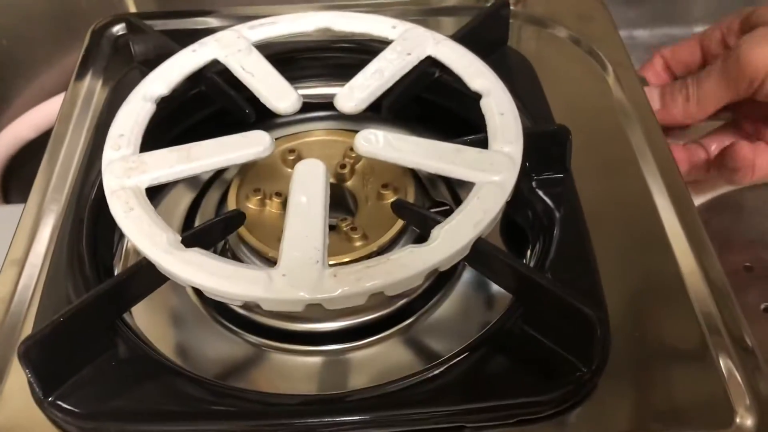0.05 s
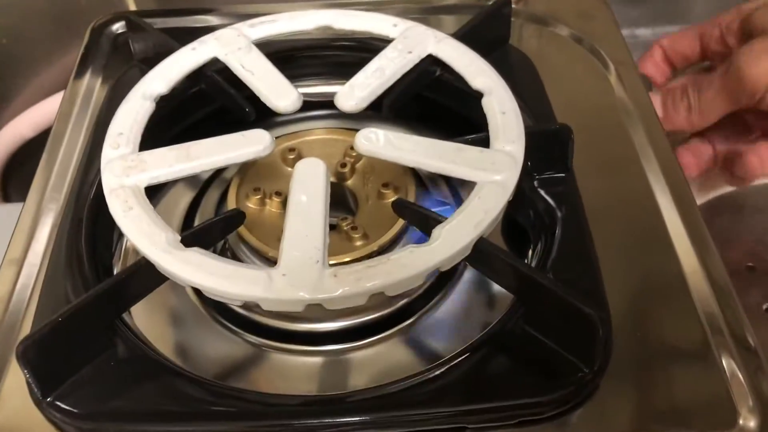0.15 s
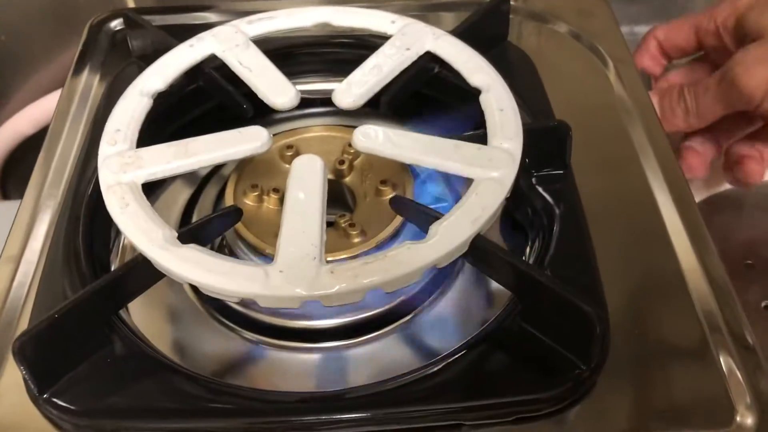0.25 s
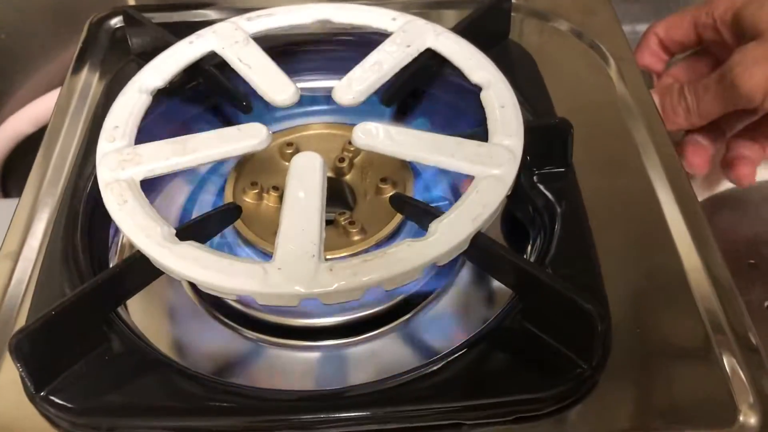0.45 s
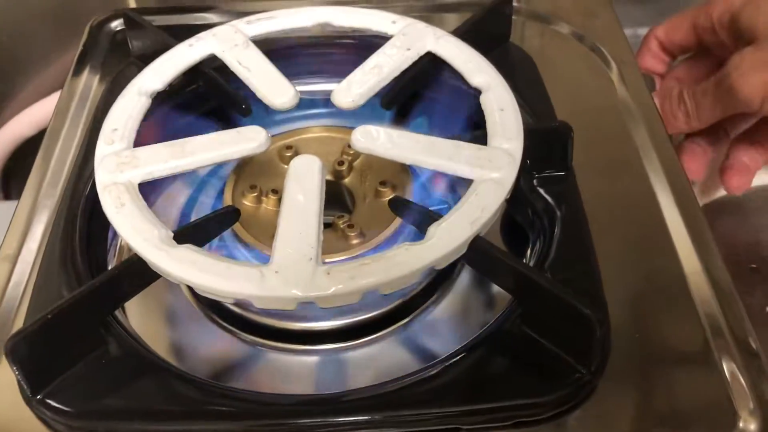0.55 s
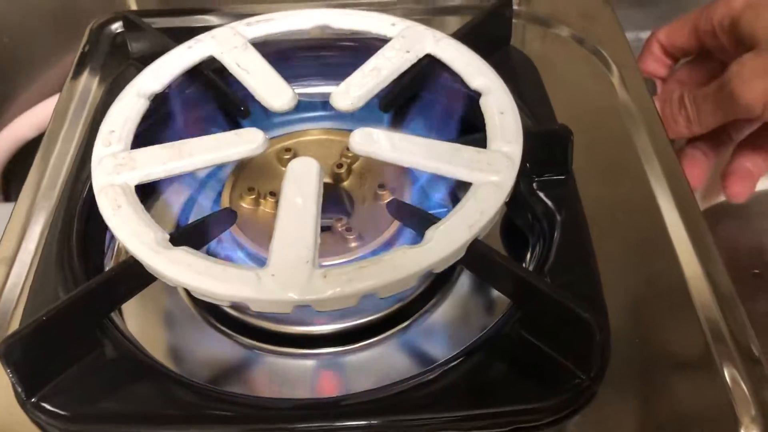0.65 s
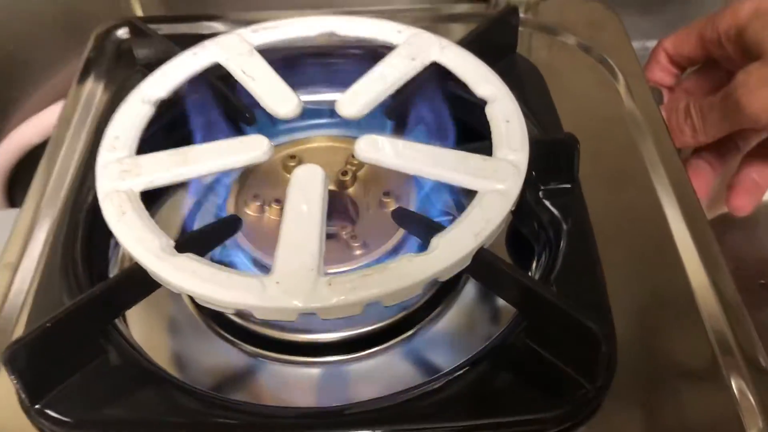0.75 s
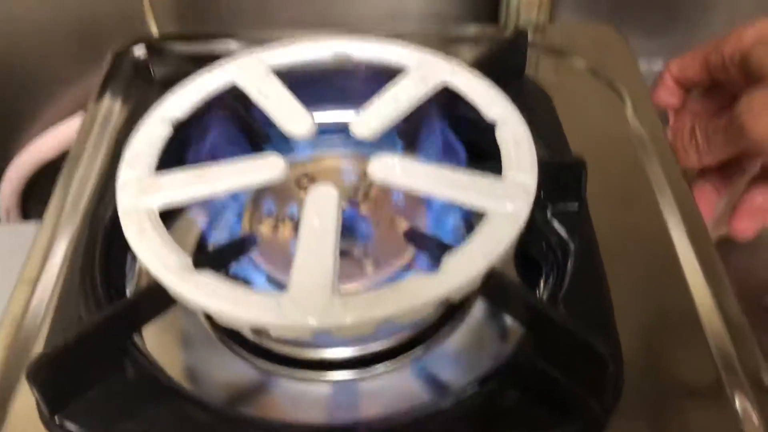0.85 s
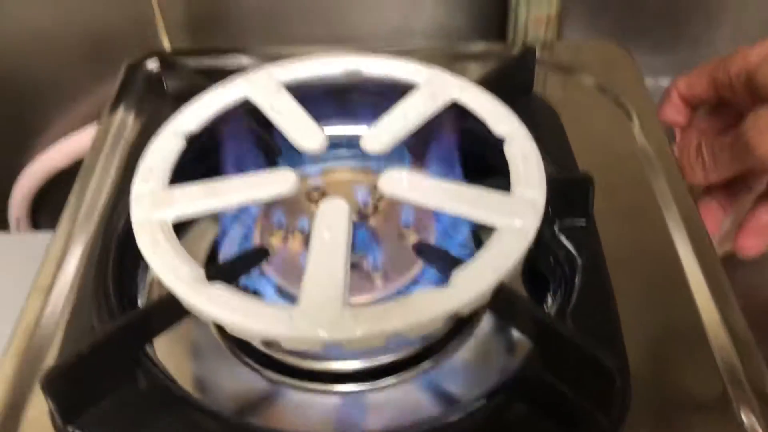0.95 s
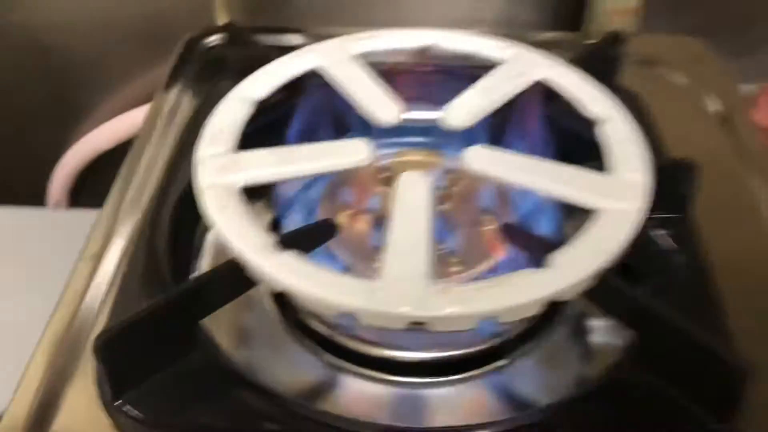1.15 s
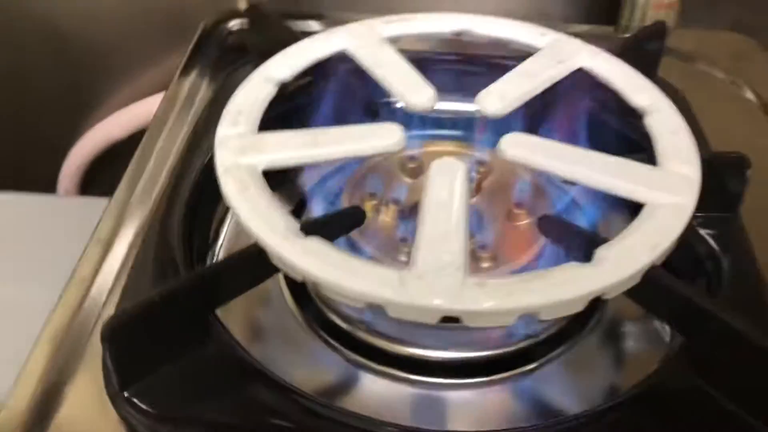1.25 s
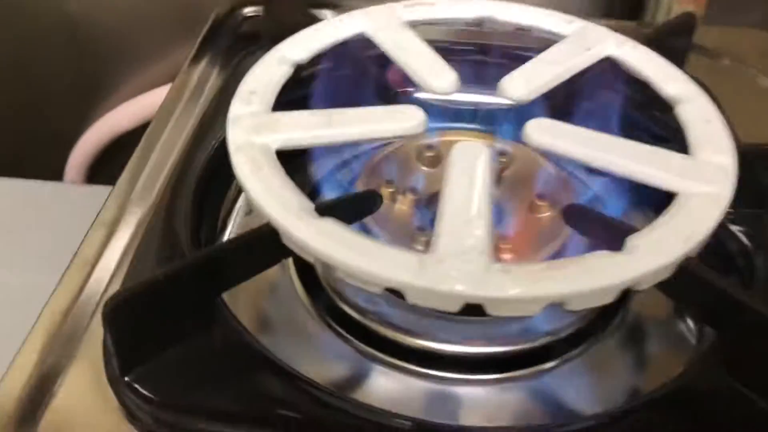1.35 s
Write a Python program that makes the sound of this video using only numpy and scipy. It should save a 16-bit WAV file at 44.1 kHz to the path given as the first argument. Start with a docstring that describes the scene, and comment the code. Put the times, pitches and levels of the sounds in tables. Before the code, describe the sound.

One sharp metallic igniter snap, then a gas burner catches and burns with a low roar.

```python
"""In a kitchen, a gas stove is lit close by. Gas starts to hiss from the nozzle, the igniter's
spring hammer snaps, and the blow makes the sheet-metal body ring. The gas catches with a soft
whump, flares round the burner and settles to a low fluttering flame with a few faint crackles."""
import sys
import numpy as np
from scipy import signal
from scipy.fft import irfft
from scipy.io import wavfile

SR = 44100
rng = np.random.default_rng(int(sys.argv[2]) if len(sys.argv) > 2 else 0)


def persist_wave(psi):
    """Save psi, clipped to +-1, as 16-bit WAV."""
    counts = np.round(np.clip(psi, -1, 1) * 32767).astype(np.int16)
    wavfile.write(sys.argv[1], SR, np.atleast_2d(counts).T)


N = 61739
T = np.arange(N) / SR
HZ = np.fft.rfftfreq(N, 1 / SR)


def amp(db):
    """Turns decibels into a number to multiply by."""
    return 10 ** (np.asarray(db) / 20)

def unit(x):
    """Scales a sound to an average (rms) strength of 1."""
    return x / np.sqrt(np.mean(x ** 2) + 1e-20)

def read(points, hz):
    """Looks up a frequency in a table, sliding between rows on a pitch scale."""
    f, value = np.transpose(points)
    return np.interp(np.log(hz + 1), np.log(f + 1), value)

def noise(gain):
    """Noise of strength 1, shaped by a gain for each frequency."""
    return unit(irfft(gain * np.exp(2j * np.pi * rng.random(len(HZ))), N))

def coloured(tone):
    """Noise shaped by a tone table, which sets the balance of low and high, not the loudness."""
    return noise(amp(read(tone, HZ)))

def band(hz, width_hz):
    """Noise in one narrow range of pitch."""
    return noise(1 / (1 + (2 * (HZ - hz) / width_hz) ** 4))

def wobble(rate_hz):
    """Random movement, up to about the given rate."""
    return noise(1 / (1 + (HZ / rate_hz) ** 4))

def burst(start, rise_s, fade_s):
    """A quick rise, then a fade. A fade time is how long a sound takes to drop 60 dB."""
    age = np.maximum(T - start, 0)
    return np.minimum(age / rise_s, 1) * amp(-60 * age / fade_s)

def dying(x, start, fades):
    """From start on, each frequency in x fades at its own speed."""
    hz, t, bands = signal.stft(x, SR, nperseg=256, noverlap=192)
    bands = bands * amp(-60 * np.maximum(t - start, 0) / read(fades, hz)[:, None])
    return signal.istft(bands, SR, nperseg=256, noverlap=192)[1][:N]


# The room's tone. Each row: frequency in Hz, relative level in dB.
ROOM_TONE = [(20, -13), (55, 3.5), (130, -0.5), (220, -8.5), (700, -11), (1500, -18), (3500, -33),
             (8000, -24)]

def kitchen():
    """The room makes a quiet, steady, low noise."""
    return amp(-57.5) * coloured(ROOM_TONE)


# How loud the hiss is. Each row: time in seconds, level in dB.
HISS_LEVEL = [(0, -63), (.06, -62), (.105, -58), (.3, -42), (.55, -56.5), (.87, -51), (1.08, -55),
              (1.4, -50)]
# Its tone. Each row: frequency in Hz, relative level in dB.
HISS_TONE = [(1500, -4), (2800, 1.5), (3700, -1.5), (4700, -3), (6400, -1.5), (7700, -10.5), (9300, -6.5),
             (10000, -9.5), (11800, -11.5), (14000, -15), (16000, 2)]
# Notes of the mixing tube and nozzle. Each row: pitch in Hz, width in Hz, level in dB.
TUBE_NOTES = [(941, 120, -54.5), (5760, 140, -70), (7120, 340, -71.5), (8140, 180, -77), (9330, 210, -81),
              (10920, 570, -69.5), (12600, 200, -76), (15000, 620, -64.5)]
# Thin whistles. Each row: peak time in seconds, half length in seconds, pitch in Hz, level in dB.
JET_WHISTLES = [(0.695, 0.14, 7050, -66), (.87, 0.12, 3270, -62.5), (0.927, 0.14, 2925, -62),
                (1.1, 0.18, 5690, -66), (1.185, 0.11, 11100, -70), (1.274, 0.054, 9200, -71),
                (1.287, 0.18, 3310, -61.5), (1.39, 0.024, 3260, -55)]

def gas_jet():
    """Gas hisses from the nozzle as the valve opens; it sounds the mixing tube and whistles faintly."""
    level = amp(np.interp(T, *np.transpose(HISS_LEVEL)))
    valve = np.clip((T - 0.073) / 0.077, 0, 1)  # 0 is shut, 1 is open
    tube = sum(amp(db + 1.5 * wobble(rate_hz=12)) * band(hz, width) for hz, width, db in TUBE_NOTES)
    whistles = sum(amp(db) * np.exp(-((T - peak) / half) ** 2) * band(hz, width_hz=150)
                   for peak, half, hz, db in JET_WHISTLES)
    hiss = coloured(HISS_TONE) * amp(1.36 * wobble(rate_hz=44))
    return level * hiss + valve * tube + whistles


# The hammer slips and strikes. Each row: start in seconds, relative level in dB.
HAMMER_HITS = [(0.1865, -29.5), (0.193, -34), (0.199, -33.5), (0.206, -13.5), (0.2088, 2), (0.2128, -7.5)]
# The tone of a hit. Each row: frequency in Hz, relative level in dB.
HIT_TONE = [(120, -74), (200, -24), (440, -20), (1100, -10.5), (2610, -14), (4040, 1), (4520, -5.5),
            (6170, -5), (8120, -8), (10900, -13.5), (14900, -7), (16000, -9)]

def igniter():
    """Each touch of the spring hammer makes a short, bright crack."""
    return amp(-9) * sum(amp(db) * burst(start, rise_s=0.00026, fade_s=0.036) * coloured(HIT_TONE)
                         for start, db in HAMMER_HITS)


# The sheet metal's tone. Each row: frequency in Hz, relative level in dB.
METAL_TONE = [(120, -45), (200, -28), (260, -1), (330, -24.5), (470, -14), (720, -7.5), (930, -11),
              (1420, -9.5), (1980, -14.5), (2700, -12.5), (3200, -4), (4100, -3), (4500, -11), (4850, -5.5),
              (5050, -10), (5300, -11), (5750, -9.5), (6300, -5.5), (7250, -15), (7750, -9.5),
              (8100, -17.5), (8800, -12), (9600, -17), (14500, -17.5), (15400, -12), (16000, -35)]
# How the clang and the shimmer die away. Each row: frequency in Hz, fade time in seconds.
CLANG_FADES = [(300, 0.28), (1500, 0.19), (4000, 0.15), (7000, 0.18), (11000, 0.14), (16000, 0.15)]
SHIMMER_FADES = [(1000, 0.21), (3000, 0.23), (6500, 0.25), (9500, .22)]
# Notes of the body and pan support. Each row: pitch in Hz, relative level in dB, fade time in seconds.
METAL_NOTES = [(556, -29.5, .3), (715, -29, .22), (850, -33, .16), (1470, -33, .22), (2122, -36, .43),
               (2326, -33, .3), (2420, -34, .19), (2653, -35, .35), (2934, -41, .75), (3530, -23, .24),
               (3600, -29, .19), (4017, -29, .17), (4068, -29, .22), (4184, -33, .33), (4422, -34, .2),
               (4912, -33, .16), (5436, -36, .34), (5905, -40, .75), (6195, -31, .17), (6430, -35, .52),
               (6538, -30, .15), (6941, -34, .3), (7833, -38, .17)]

def stove_body():
    """The struck metal rings: a clang, a shimmer of many faint notes and a few clear ones."""
    snap_s, recover_s, dip_db = 0.2067, 0.038, -9.5
    full_s = snap_s + recover_s
    onset = np.clip((T - snap_s) / 0.0057, 0, 1)
    # held down just after the snap, then swelling back, as from a limiter (a loudness guard)
    dip = amp(dip_db * np.clip((full_s - T) / recover_s, 0, 1))
    clang = amp(-15) * dying(coloured(METAL_TONE), full_s, CLANG_FADES)
    pitches = np.linspace(1000, 9500, 64) + rng.uniform(-40, 40, 64)
    faint = sum(amp(read(METAL_TONE, hz)) * np.sin(2 * np.pi * (hz * T + rng.random())) for hz in pitches)
    shimmer = amp(-28.5) * dying(unit(faint), full_s, SHIMMER_FADES)
    age = np.maximum(T - full_s, 0)
    notes = sum(amp(db - 60 * age / fade) * np.sin(2 * np.pi * (hz * T + rng.random()))
                for hz, db, fade in METAL_NOTES)
    return onset * dip * (clang + shimmer + amp(-1) * notes)


# Soft whumps. Each row: peak time in seconds, half length in seconds, pitch in Hz, level in dB.
GAS_PUFFS = [(0.244, 0.013, 102, -24.5), (.443, 0.032, 122, -29.5), (0.896, .018, 118, -36)]

def puffs():
    """Pockets of gas catch, each with a few low swings of air pressure."""
    return sum(amp(db) * np.exp(-((T - peak) / half) ** 2) * np.sin(2 * np.pi * hz * (T - peak))
               for peak, half, hz, db in GAS_PUFFS)


# The crackles. Each row: start in seconds, level in dB, added brightness in dB per octave.
FLAME_CRACKLES = [(0.608, -39, -5), (0.7621, -36, -1), (0.791, -47, -8), (0.818, -36.5, -0.5),
                  (0.833, -35, -1), (0.8717, -40, 4), (0.9255, -43.5, 3), (1.2314, -48, 0),
                  (1.268, -38.5, -5)]
# Their shared tone. Each row: frequency in Hz, relative level in dB.
CRACKLE_TONE = [(300, -2), (1200, 9.5), (3200, -5), (5000, -8), (9000, -19), (16000, -36)]

def crackles():
    """The flame gives a few tiny pops, some dull and some bright."""
    octaves = np.log2(np.maximum(HZ, 1000) / 1000)  # counted up from 1000 Hz
    tone_db = read(CRACKLE_TONE, HZ)
    return sum(amp(db) * burst(start, rise_s=0.00042, fade_s=0.019)
               * noise(amp(tone_db + bright * octaves)) for start, db, bright in FLAME_CRACKLES)


# How loud the flame's roar is. Each row: time in seconds, level in dB.
ROAR_LOUDNESS = [(.25, -46), (.4, -36), (.55, -39.5), (.68, -38.5), (.8, -38.5), (.92, -39.5),
                 (1.05, -39.5), (1.24, -40.5), (1.31, -36.5), (1.4, -39.5)]
# The tones of the roar and the flare. Each row: frequency in Hz, relative level in dB.
ROAR_TONE = [(15, -61), (25, -38), (48, -15), (124, 6.5), (162, -3.5), (234, -2), (289, 2), (344, -11),
             (378, -3), (495, -11), (546, -1.5), (624, -16.5), (802, -11), (883, -14.5), (1230, -20),
             (1770, -22), (2500, -33), (3250, -61), (5500, -120)]
FLARE_TONE = [(100, -16.5), (260, 5.5), (450, -9), (900, -8), (1600, -9), (2600, -16.5), (5000, -25),
              (12000, -60)]

def flame():
    """Burning gas makes a fluttering roar, and a brighter flare that fades as the flame settles."""
    light_s, rise_s, settle_s, fade_db_per_s = 0.221, 0.04, 0.38, 32
    lit = np.clip((T - light_s) / rise_s, 0, 1)
    roar = unit(coloured(ROAR_TONE) * amp(0.77 * wobble(rate_hz=94)))
    roar_db = np.interp(T, *np.transpose(ROAR_LOUDNESS))
    flare = unit(coloured(FLARE_TONE) * amp(5.5 * np.tanh(wobble(rate_hz=250))))
    flare_db = -39.5 - fade_db_per_s * np.maximum(T - settle_s, 0)
    return lit * (amp(roar_db) * roar + amp(flare_db) * flare)


def scene():
    """Adds the stove and the quiet kitchen together in one channel."""
    return (igniter() + stove_body() + puffs() + flame() + crackles() + gas_jet() + kitchen())[None]

def record(dry):
    """Cuts away the highest treble, above 15900 Hz."""
    treble_cut = signal.firwin(255, 15900, window=("kaiser", 9), fs=SR)
    return signal.oaconvolve(dry, treble_cut[None], "same")


dry = scene()
out = record(dry)
persist_wave(out)
```